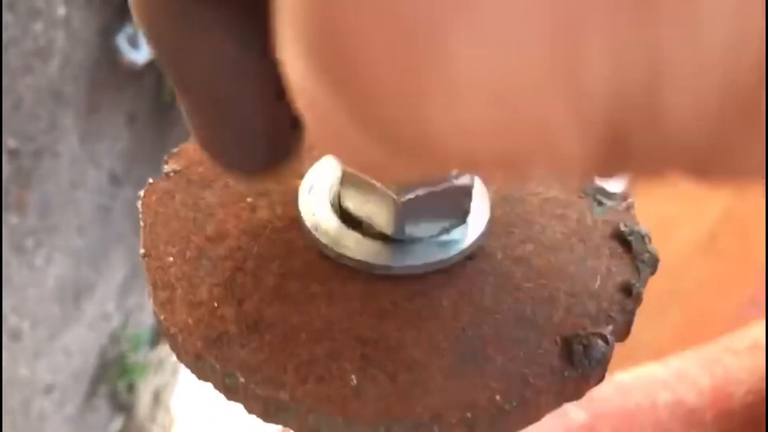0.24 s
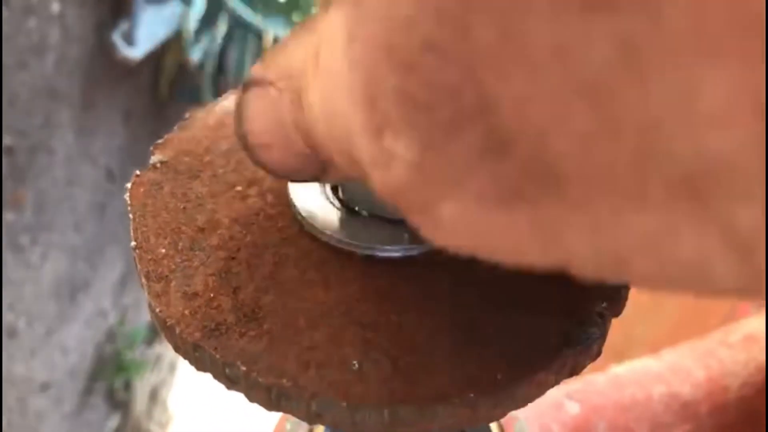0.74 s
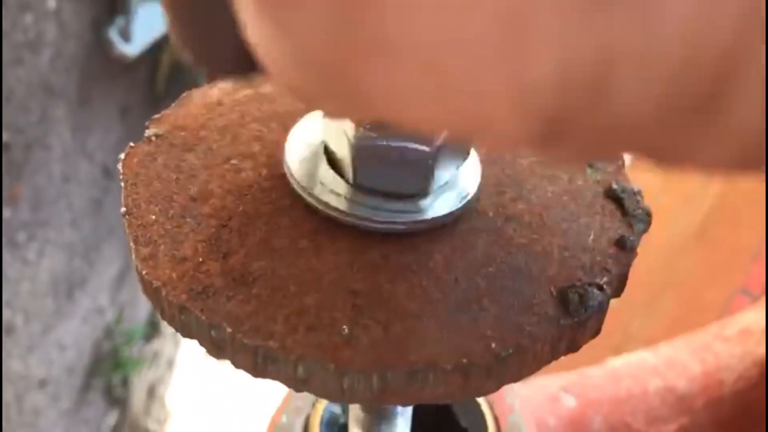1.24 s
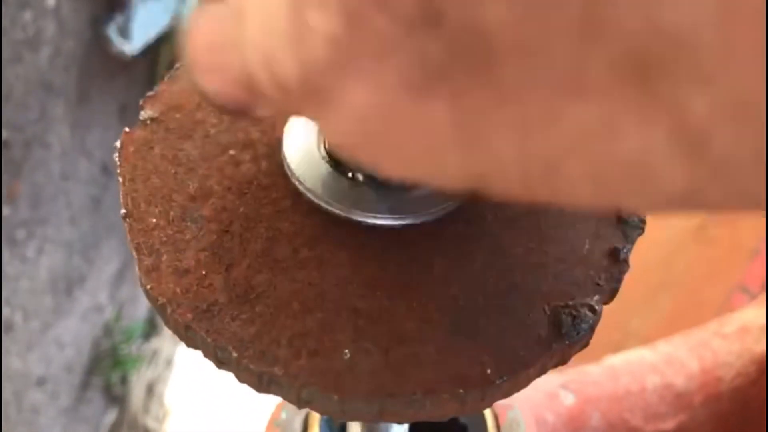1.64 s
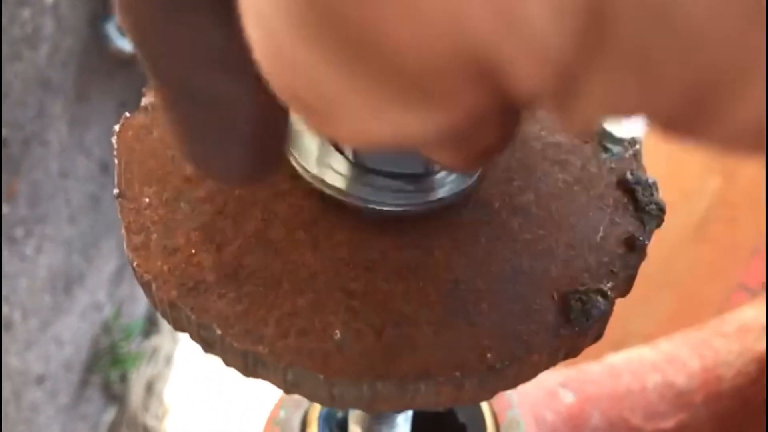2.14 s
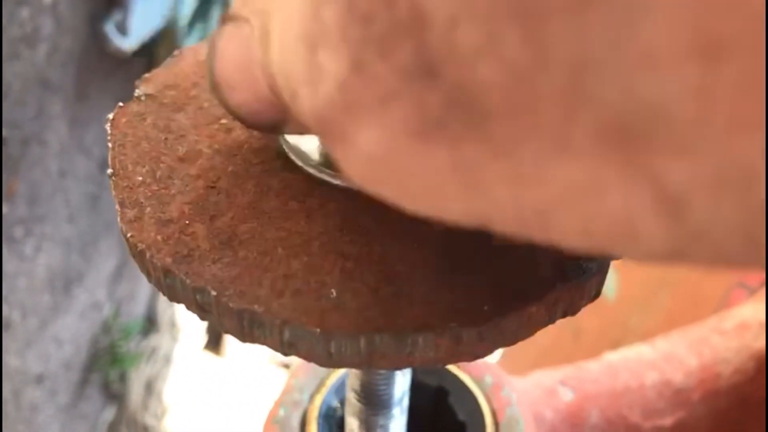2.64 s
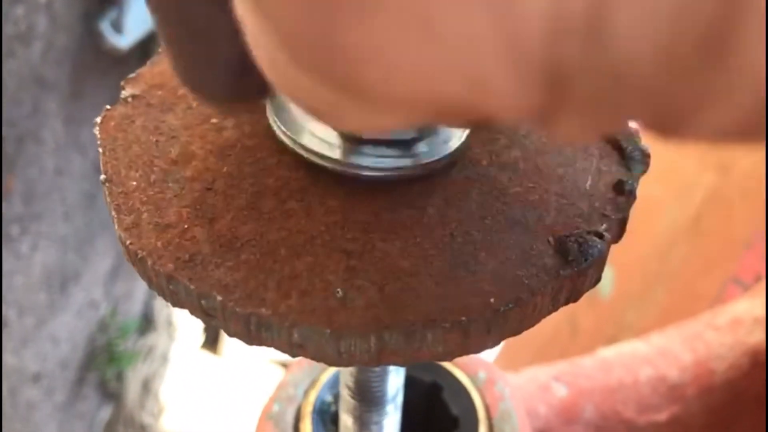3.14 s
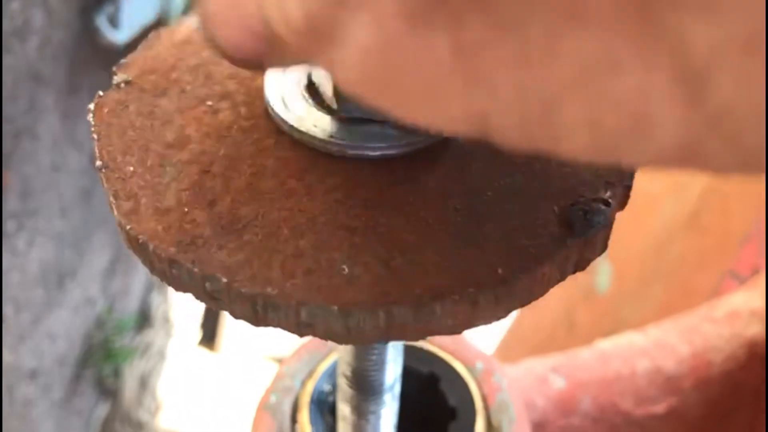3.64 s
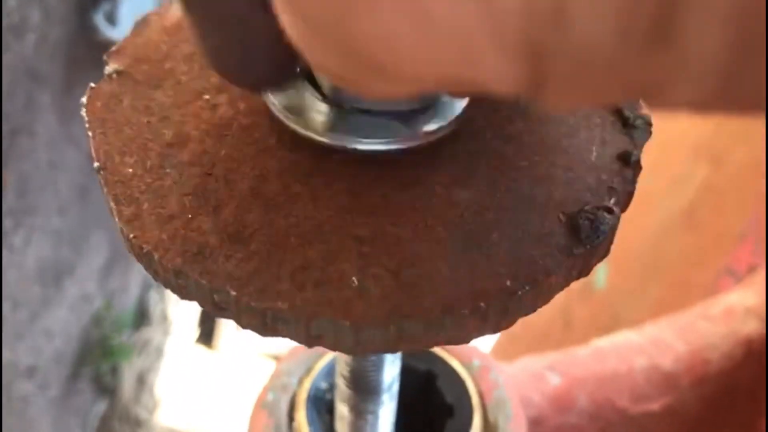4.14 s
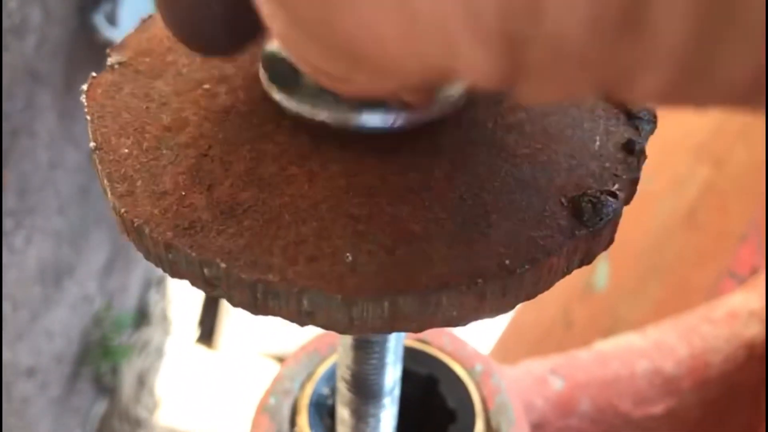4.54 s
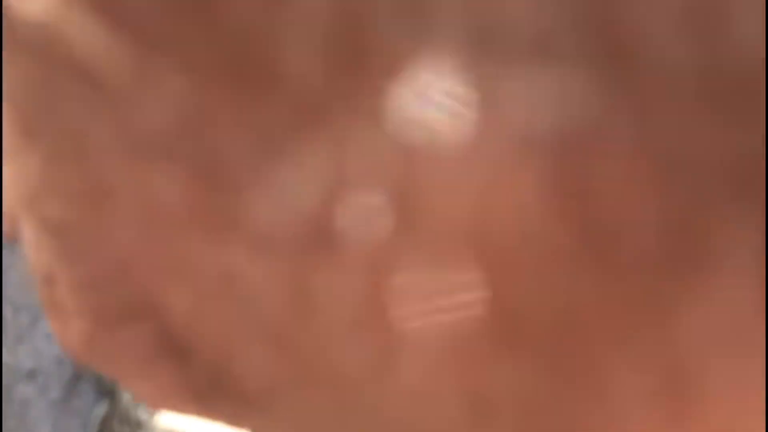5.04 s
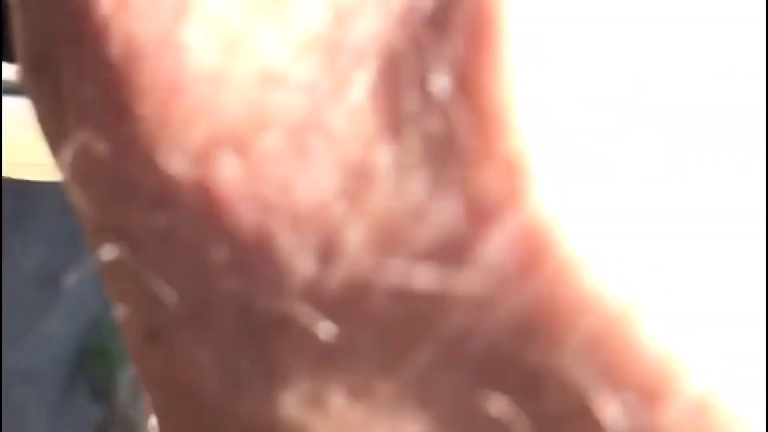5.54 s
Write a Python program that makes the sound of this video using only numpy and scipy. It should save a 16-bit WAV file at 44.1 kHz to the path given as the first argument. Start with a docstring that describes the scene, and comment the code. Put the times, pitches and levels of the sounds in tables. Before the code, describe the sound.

Very close in a quiet workshop, a nut and loose washer tick and jingle irregularly while being spun by hand on a steel stud. Each turn adds a light rasp from the threads. After a brighter flurry of ringing clinks the metal settles, and soft bumps and a couple of sharp clicks follow as the microphone is handled. A low rumble, hiss and a barely audible thin tone lie underneath.

```python
"""Steel nut on a threaded stud

Fingers spin a nut down a stud through a rusty plate, close to a phone in a workshop. Each knock cracks
and excites three resonators anew: the loose washer, whose split mode pairs beat, the nut and the stud.
Stick-slip friction of the threads scrapes between knocks. At the end a hand brushes, thumps and clicks
on the phone. Under it all lie a low rumble, a hiss and a faint thin tone."""
import sys
import numpy as np
from scipy import signal
from scipy.fft import rfft, irfft
from scipy.io import wavfile

SR = 44100
rng = np.random.default_rng(int(sys.argv[2]) if len(sys.argv) > 2 else 0)


def materialize(psi):
    """Save the field psi as 16-bit PCM at rate SR to the path in sys.argv[1].

    A 1-D psi becomes a single channel; in a 2-D psi each row is a channel.
    """
    bounded = np.clip(np.atleast_2d(psi).T, -1, 1)
    quanta = np.round(bounded * 32767).astype(np.int16)
    wavfile.write(sys.argv[1], SR, quanta)


N = 255334
T = np.arange(N) / SR
PALM_S = 4.85  # the palm comes to rest on the washer

# short-lived modes of stud and plate: (frequency [Hz], t60 [s], relative level [dB])
PLATE_MODES = [(320, 0.012, -13), (1644, 0.033, -18.5), (3400, 0.028, 0), (5244, 0.053, -3.5),
               (5253, 0.049, -0.5), (6360, 0.025, -1.5), (6985, 0.049, 5), (8290, 0.024, -2),
               (8640, 0.012, -2), (9150, 0.027, 3.5), (9610, 0.011, -2.5), (10980, 0.0079, -9),
               (11320, 0.041, -3.5)]


def undb(db):
    return 10 ** (np.asarray(db) / 20)


def unit(x):
    return x / np.sqrt(np.mean(x ** 2))


def band(x, lo_hz, hi_hz):
    return signal.sosfilt(signal.butter(2, [lo_hz, hi_hz], "bandpass", fs=SR, output="sos"), x)


def fade(age, t60):
    """Exponential decay, by 60 dB in t60 seconds."""
    return np.exp(-np.log(1000) * age / t60)


def slew(x, seconds):
    """First-order lag with the given time constant."""
    keep = np.exp(-1 / (seconds * SR))
    return signal.lfilter([1 - keep], [1, -keep], x)


def wander(seconds):
    """Low-passed noise: a smooth random fluctuation of unit RMS."""
    return unit(slew(slew(rng.standard_normal(N), seconds), seconds))


def latest(onsets):
    """Index of the most recent onset at each sample."""
    return np.clip(np.searchsorted(onsets, T, "right") - 1, 0, None)


def bursts(onsets, db, t60):
    """Superposed transient envelopes: each starts at once, decays and is cut off after 0.15 s."""
    out = np.zeros(N)
    for onset, gain in np.broadcast(onsets, undb(db)):
        i = int(onset * SR)
        age = T[:min(N - i, int(.15 * SR))]
        out[i:i + len(age)] += gain * fade(age, t60)
    return out


def slips(per_s, spread_db):
    """Stick-slip as a Poisson train of impulses, a few much larger than the rest."""
    size_db = spread_db * np.minimum(rng.exponential(size=N), 3.0)
    return unit((rng.random(N) < per_s / SR) * undb(size_db) * rng.standard_normal(N))


def mode(force, hz, t60):
    """Forced response of a damped oscillator whose frequency may vary in time."""
    spin = np.exp(2j * np.pi * np.cumsum(np.broadcast_to(hz, N)) / SR)
    return (spin * signal.lfilter([1], [1, -fade(1 / SR, t60)], force / spin)).imag


def ringer(hz, onsets, db, t60, rise_s=0.00026):
    """Free decay of a mode reset by each contact: a blow acts fast, a damping finger takes a few ms."""
    k = latest(onsets)
    swing = undb(db)[k] * fade(T - onsets[k], np.broadcast_to(t60, len(onsets))[k])
    swing = np.maximum(slew(swing, rise_s), slew(swing, .007))
    return np.sqrt(2) * swing * np.sin(2 * np.pi * (hz * T + rng.random()))


def workshop():
    """Coloured noise, split at 400 Hz into a fluttering rumble and a steady hiss."""
    # background spectrum: (frequency [Hz], relative spectral density [dB])
    spectrum = [(24, -18), (40, 0.5), (94, -3.5), (231, -16), (371, -28.5), (655, -34), (755, -36.5),
                (1690, -50), (1900, -37), (2470, -54.5), (4060, -40.5), (6070, -55), (11500, -54.5),
                (15000, -70), (22000, -120)]
    # the low rumble drifts a few dB up and down: (time [s], level [dB])
    rumble_drift = [(0, -55), (1.2, -51), (1.47, -57), (1.9, -50.5), (2.2, -54.5), (2.6, -52), (3.6, -51),
                    (3.8, -52.5), (4.7, -51.5), (5.4, -53.5), (5.79, -51.5)]
    hz, db = np.transpose(spectrum)
    f = np.arange(N // 2 + 1) * SR / N + 1
    colour = rfft(rng.standard_normal(N)) * undb(np.interp(np.log(f), np.log(hz), db))
    low_share = 1 / (1 + (f / 400) ** 4)
    rumble_db = np.interp(T, *np.transpose(rumble_drift)) + 0.71 * wander(0.026) + 0.78 * wander(.15)
    rumble = undb(rumble_db) * unit(irfft(colour * low_share, N))
    hiss = undb(-65.5) * unit(irfft(colour * (1 - low_share), N))
    return rumble + hiss


def thin_tone():
    """A faint, lightly damped sinusoid that starts now and then and dies away."""
    # starts of the tone: (time [s], level [dB])
    starts = [(1.16, -72), (1.48, -58.5), (2.19, -69), (3.12, -73.5), (4.2, -67), (4.62, -68.5)]
    onsets, db = np.transpose(starts)
    return ringer(2336, onsets, db, t60=1.4, rise_s=.007) * (T > onsets[0])


def handling():
    """Structure-borne sound of a hand on the phone: hard contacts click and ring, soft ones thump."""
    # hard contacts: (time [s], level [dB], frequency [Hz], level of the tight ring [dB])
    clicks = [(5.069, -56, 5100, -63), (5.265, -50.5, 6960, -61.5), (5.452, -50, 4080, -70),
              (5.494, -35.5, 1950, -29), (5.51, -36.5, 1720, -63), (5.538, -45, 5000, -59.5),
              (5.549, -54, 4560, -65.5), (5.592, -53, 5970, -80), (5.601, -47, 6000, -77),
              (5.623, -45.5, 6100, -75), (5.696, -24, 6700, -34.5), (5.724, -4.5, 5950, -28),
              (5.736, -6.5, 6250, -43), (5.766, -28, 3130, -60)]
    # modes of the case: (frequency [Hz], level relative to the click [dB], t60 [s])
    case_modes = [(950, -25.5, 0.067), (1460, -27, .05), (3250, -19, .04), (5070, -37.5, 0.47)]
    # soft contacts that sink in pitch: (time [s], level [dB], start frequency [Hz], end frequency [Hz])
    thumps = [(1.827, -32.5, 297, 113), (2.111, -39, 424, 340), (2.466, -39.5, 435, 328),
              (4.855, -33, 149, 101.3), (5.243, -28.5, 96.6, 73.4), (5.283, -28.5, 289, 66),
              (5.367, -30.5, 101.5, 64.6), (5.6, -34, 340, 192), (5.61, -27.5, 304, 91),
              (5.624, -27, 372, 86), (5.66, -32.5, 149, 74.6), (5.725, -33, 360, 237)]
    out = np.zeros(N)
    for onset, db, hz, tight_db in clicks:
        age, noise = T - onset, rng.standard_normal(N)
        snap = 2.24 * bursts(onset, db, t60=.0012) * np.sin(2 * np.pi * hz * age)
        rattle = 0.094 * unit(mode(noise, hz, t60=0.0083))
        rattle += .5 * unit(band(band(noise, 145, 9200), 240, 12000))
        rattle *= bursts(onset, db - 5.5, t60=0.016) + bursts(onset, db - 7.5, t60=.002)
        tight_ring = bursts(onset, tight_db, t60=0.079) * np.sin(2 * np.pi * 4267 * age)
        out += snap + rattle + tight_ring
        for case_hz, case_db, t60 in case_modes:
            out += bursts(onset, db + case_db, t60) * np.sin(2 * np.pi * case_hz * age)
    for onset, db, start_hz, end_hz in thumps:
        age = np.clip(T - onset, 0, None)
        glide_hz = end_hz + (start_hz - end_hz) * fade(age, 0.027)
        cycles = np.cumsum((age > 0) * glide_hz) / SR
        out += undb(db) * np.sin(2 * np.pi * cycles) * fade(age, 0.074) * (1 - fade(age, 0.013))
    return signal.sosfilt(signal.butter(4, 9500, fs=SR, output="sos"), out)  # the palm muffles the treble


def plate(force, spot_db):
    """Modal superposition in stud and plate; contact spot and grip vary each mode's level and tuning."""
    return sum(mode(undb(db + spot) * force, hz * (1 + .007 * wander(0.0067)), t60)
               for (hz, t60, db), spot in zip(PLATE_MODES, spot_db))


def stroke_envelope(timing, peak_db, start_db, end_db, rest_db):
    """Amplitude modulation by strokes that grip, peak, ease and let go; start and end dB re the peak."""
    grip_s, let_go_s = 0.017, .035
    level_db = np.full(N, float(rest_db))
    for (start, peak, end), db in zip(timing, peak_db):
        times = np.maximum.accumulate([start - grip_s, start, peak, end, end + let_go_s])
        stroke_db = np.interp(T, times, [rest_db, db + start_db, db, db + end_db, rest_db])
        level_db = np.maximum(level_db, stroke_db)
    return undb(level_db)


def scrape():
    """Friction noise of thread on thread, direct and through the plate; later only skin brushing by."""
    # finger strokes: (start [s], peak [s], end [s], bright level [dB], dull level [dB])
    strokes = [(0, 0.03, 0.066, -59, -54.5), (0.112, 0.233, 0.2, -42.5, -52.5),
               (0.374, 0.382, 0.39, -45.5, -46), (0.428, 0.495, 0.62, -46.5, -54),
               (.72, 0.802, 0.9, -53, -51.5), (.81, 0.84, 0.89, -35, -45.5),
               (0.925, 1.036, 1.04, -59.5, -55), (1.047, 1.124, 1.19, -48, -53.5),
               (1.144, 1.193, 1.18, -45.5, -53.5), (1.36, 1.4, 1.51, -53, -53),
               (1.404, 1.442, 1.564, -41.5, -53), (1.64, 1.802, 1.85, -45, -53),
               (1.966, 1.978, 1.96, -54, -58), (2.002, 2.11, 2.18, -41.5, -51.5),
               (2.324, 2.388, 2.44, -47, -57), (2.43, 2.457, 2.485, -53, -54),
               (2.64, 2.795, 2.86, -43, -54), (2.898, 3.062, 3.13, -51, -51.5),
               (3.307, 3.459, 3.51, -42.5, -54.5), (3.649, 3.732, 3.8, -45, -52),
               (3.985, 4.092, 4.16, -48.5, -55), (4.109, 4.136, 4.16, -35, -67),
               (4.293, 4.305, 4.38, -52.5, -54), (4.34, 4.43, 4.51, -49.5, -53),
               (4.501, 4.556, 4.57, -42.5, -54.5), (4.6, 4.641, 4.74, -60.5, -50.5),
               (4.746, 4.804, 4.97, -68, -55), (4.884, 4.933, 5.2, -60, -56.5),
               (5.281, 5.42, 8.8, -64, -64.5), (5.6, 5.61, 5.65, -53, -59), (5.66, 5.693, 5.71, -53, -59),
               (5.718, 5.738, 5.8, -35, -39.5)]
    timing = np.array(strokes)[:, :3]
    bright_db, dull_db = np.transpose(strokes)[3:]
    grit = slips(per_s=2800, spread_db=2.3) + 0.62 * slips(per_s=220, spread_db=1.1)
    grit += 0.69 * rng.standard_normal(N)
    # the contact moves on, so each mode flares and fades on its own
    flare_db = [6 * wander(0.005) for _ in PLATE_MODES]
    metal = unit(plate(grit, flare_db)) * (T < PALM_S + .05)
    bright = undb(-4.5) * unit(band(grit, 2800, 11500)) + undb(5) * metal
    bright *= stroke_envelope(timing, bright_db, start_db=-18, end_db=-15.5, rest_db=-72.5)
    dull = (0.66 * unit(band(grit, 650, 4200)) + 0.38 * unit(band(grit, 1446, 2010))
            + .5 * unit(band(grit, 267.4, 356.0)))
    dull *= stroke_envelope(timing, dull_db, start_db=-7.5, end_db=-5.5, rest_db=-72)
    return bright + dull


def washer(onsets, low_db, high_db, crack_db):
    """Mode splitting: the loose washer's tone and overtone are each a pair of close modes that beat."""
    # the two modes of the tone: (frequency [Hz])
    tone_hz = [4294, 4410]
    # the two modes of the overtone: (frequency [Hz], relative level [dB])
    overtones = [(9925, -10.5), (10119, -10.5)]
    t60 = np.where(onsets > PALM_S, 0.41, 0.8)  # the palm adds damping
    out = ringer(tone_hz[0], onsets, low_db, t60) + ringer(tone_hz[1], onsets, high_db, t60)
    # the overtone grows faster than the tone and sharp cracks feed it too, up to a ceiling
    tone_db = np.maximum(low_db, high_db)
    overtone_db = np.maximum(-52 + 1.26 * (tone_db + 40), crack_db - 24.5)
    overtone_db = np.minimum(overtone_db, tone_db + 0.83)
    lean_db = 0.64 * (low_db - high_db)  # a spot that favours the lower mode does so in both pairs
    for (hz, db), lean in zip(overtones, [lean_db, -lean_db]):
        out += ringer(hz, onsets, overtone_db + db + lean, np.minimum(t60, 0.51))
    return out


def nut(onsets, nut_db, t60):
    """Free vibration of the nut: three close modes, in a slightly different balance at each knock."""
    # modes of the nut: (frequency [Hz], relative level [dB])
    modes = [(8138, -13.5), (8202, -11), (8232, -9)]
    scatter_db = 1.2 * rng.standard_normal((len(modes), len(onsets)))
    return sum(ringer(hz, onsets, nut_db + db + scatter, t60, rise_s=0.00055)
               for (hz, db), scatter in zip(modes, scatter_db))


def stud(onsets, stud_db, nut_db, nut_t60):
    """Damped vibration of the stud: fingers that hush the nut also shorten the stud's ring."""
    # modes of the stud: (frequency [Hz], relative level [dB])
    modes = [(7000, -2.5), (7095, -8)]
    # finger damping: (nut level [dB], stud t60 [s])
    damping = [(-51, 0.029), (-34.5, 0.12)]
    t60 = np.minimum(np.interp(nut_db, *np.transpose(damping)), .65 * nut_t60)
    return sum(ringer(hz, onsets, stud_db + db, t60) for hz, db in modes)


def knocks():
    """Impact excitation: a broadband crack, a dull thud and the ringing of plate, washer, nut and stud."""
    # knocks and touches: (time [s], crack level [dB], lower washer mode [dB], upper washer mode [dB],
    # nut level [dB], nut t60 [s], stud level [dB])
    contacts = [(0.0004, -63, -38.5, -58, -30.5, 0.46, -45), (0.0205, -19, -36.5, -61, -5.5, 0.042, -12),
                (0.054, -33, -37.5, -52, -27, .11, -50), (0.181, -50, -42.5, -50, -33.5, 0.26, -26),
                (0.2133, -22.5, -37.5, -46, -30, 0.093, -15), (0.2284, -44, -45.5, -44.5, -67, .2, -70),
                (0.377, -30, -49.5, -44, -56, .2, -38), (0.4204, -50, -46.5, -57, -37.5, 0.1, -55),
                (0.522, -35, -51, -68, -31, .48, -42), (0.5535, -35, -65, -45.5, -39, 0.41, -54),
                (0.598, -41, -47, -50.5, -31, 0.12, -33.5), (0.7782, -40, -59, -54, -36.5, 0.087, -58),
                (0.8257, -34, -41, -66, -26, .2, -34), (0.843, -21.5, -55, -34, -32, 0.18, -40),
                (0.8542, -25, -35, -60, -36, .2, -21.5), (0.874, -24, -58, -53, -26, .2, -20),
                (0.8869, -25.5, -44, -34, -44.5, .2, -14), (0.923, -75.5, -38, -39.5, -60.5, .2, -71.5),
                (1.0223, -35.5, -44, -40.5, -45, 0.063, -55), (1.151, -45, -58, -50.5, -36, 0.4, -45),
                (1.3475, -35.5, -47, -49, -35, .2, -47), (1.3624, -36, -38, -54, -68, 0.23, -64),
                (1.4116, -37, -58, -41.5, -42, .33, -47), (1.4378, -25.5, -41, -52, -50, .2, -24.5),
                (1.474, -24, -54, -54, -14.5, 1, -49), (1.56, -57, -47.5, -64, -30, 1, -47),
                (1.6662, -40, -48, -51.5, -43, 0.52, -68), (1.7618, -30.5, -59, -65, -50, .2, -32),
                (1.784, -27, -42.5, -54, -32, .27, -39), (1.8025, -28.5, -48, -54, -19.5, 0.046, -47),
                (1.8282, -32.5, -43.5, -55, -70, .15, -29), (1.969, -27, -38, -47.5, -55, .25, -31),
                (2.0486, -38, -42, -41.5, -47, .37, -31.5), (2.1031, -15.5, -45, -61, -19, 0.65, -26),
                (2.1573, -30, -51, -48, -30, 0.1, -29), (2.1814, -21, -51.5, -57, -49, 0.47, -15.5),
                (2.3266, -24.5, -43, -38.5, -58, .49, -21), (2.393, -32.5, -50, -48, -28.5, 0.23, -37),
                (2.451, -36.5, -76, -44, -28, .17, -60), (2.4712, -32, -45, -48.5, -61, 0.12, -27.5),
                (2.6333, -35.5, -54, -40.5, -23, 0.033, -23), (2.7528, -30, -49, -54, -29, .2, -29.5),
                (2.769, -38, -51, -66, -22, 0.13, -53), (2.792, -36, -57, -61, -15, 0.16, -44),
                (2.8058, -20, -50, -56, -45, 0.052, -20.5), (2.8718, -40, -57.5, -54.5, -71, .2, -60),
                (3.03, -31, -45, -59, -39, 0.19, -35), (3.054, -38, -71, -67, -33, .2, -56),
                (3.0789, -25, -51, -64, -32, .23, -49), (3.101, -26, -61, -62, -22, 0.84, -49),
                (3.2485, -59, -48, -68, -58, 0.3, -58), (3.2661, -24, -39.5, -36.5, -54, .097, -19),
                (3.449, -25, -39.5, -66, -13, 0.053, -33), (3.479, -24, -39, -44, -51, 0.28, -25),
                (3.651, -38, -51.5, -55, -56, .18, -36), (3.7205, -28, -48, -65, -43, 0.21, -31.5),
                (3.7513, -23.5, -45, -59, -19.5, .13, -38), (3.784, -38, -68, -45, -21, .14, -50),
                (3.8128, -30.5, -52.5, -51.5, -55.5, .074, -26), (3.954, -45, -57, -60.5, -77.5, .2, -42),
                (3.9948, -30, -60, -69, -62, .25, -39), (4.1265, -22, -49, -58, -24, .31, -21.5),
                (4.146, -51, -46, -64, -14.5, 0.051, -35), (4.1956, -24.5, -41, -57, -55, .16, -24),
                (4.294, -23, -38.5, -51, -33, .36, -31), (4.3296, -23, -47, -59, -58, .2, -56),
                (4.351, -21, -41, -30, -50, .071, -54), (4.53, -27, -58, -44, -44, .2, -21.5),
                (4.5423, -22, -41.5, -55, -32.5, 0.66, -20), (4.601, -22.5, -44, -48.5, -6.5, 0.26, -39),
                (4.6259, -19, -25, -18.5, -7.5, .21, -29), (4.665, -51, -26.5, -22.5, -47, .57, -36),
                (4.771, -22.5, -20, -26.5, -17, 0.078, -39), (4.818, -38, -26, -31, -24.5, 0.096, -30.5),
                (4.8652, -63, -64, -56, -52, 0.26, -66)]
    onsets, crack_db, low_db, high_db, nut_db, nut_t60, stud_db = np.transpose(contacts)
    spot_db = 3.85 * rng.standard_normal((len(PLATE_MODES), len(onsets)))
    rings = nut(onsets, nut_db, nut_t60)
    rings += washer(onsets, low_db, high_db, crack_db)
    rings += stud(onsets, stud_db, nut_db, nut_t60)
    # the loose nut chatters for a moment after each knock
    chatter = slips(per_s=1400, spread_db=8.5) * bursts(onsets, crack_db - 16, t60=0.062)
    force = (bursts(onsets, crack_db, t60=.007) + chatter) * rng.standard_normal(N)
    crack = undb(5) * band(band(force, 3300, 12500), 3600, 9500)
    rings += undb(-27) * plate(force, spot_db[:, latest(onsets)])
    thud_db = -47.5 + 0.046 * (crack_db + 30)
    thud = bursts(onsets, thud_db, t60=0.043) * unit(band(rng.standard_normal(N), 330, 4700))
    return crack + thud + rings


def scene():
    """Linear superposition of all sources in one channel."""
    return (knocks() + scrape() + handling() + thin_tone() + workshop())[None]


def record(dry):
    """Band limiting: the phone drops the deepest bass, softens the extreme treble and cuts the top."""
    soft = signal.sosfilt(signal.butter(6, [38, 11700], "bandpass", fs=SR, output="sos"), dry)
    return signal.sosfilt(signal.ellip(10, .2, 70, 12700, fs=SR, output="sos"), soft)


dry = scene()
out = record(dry)
materialize(out)
```